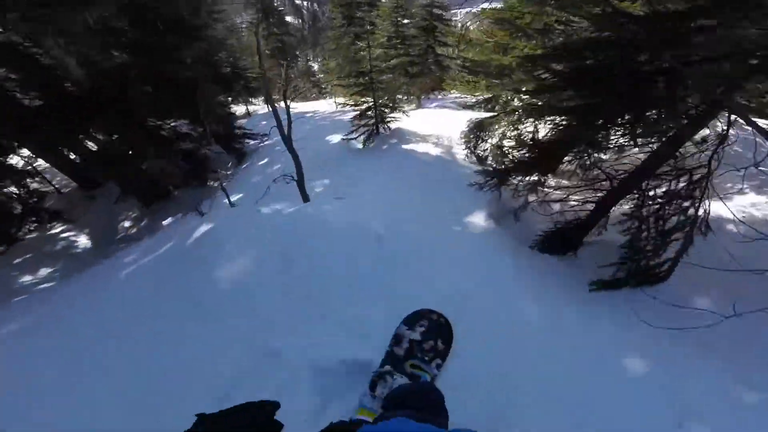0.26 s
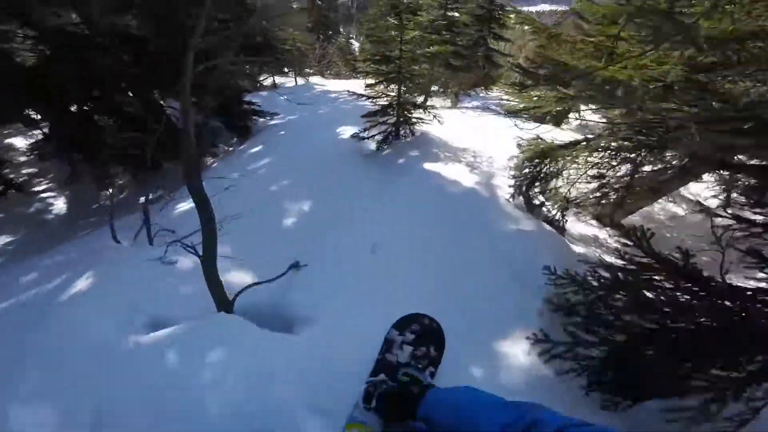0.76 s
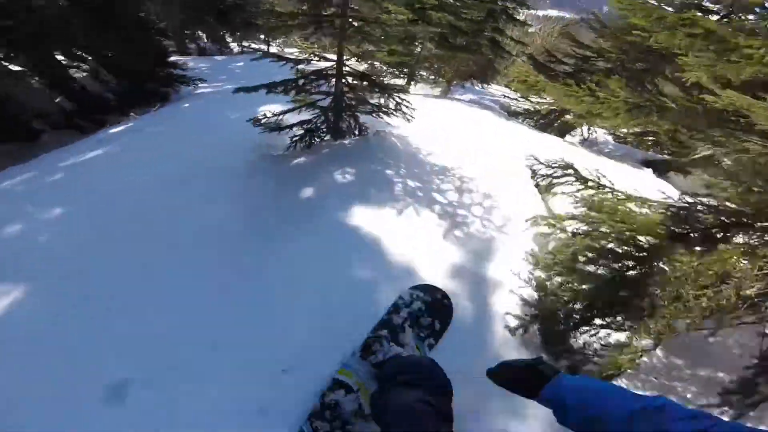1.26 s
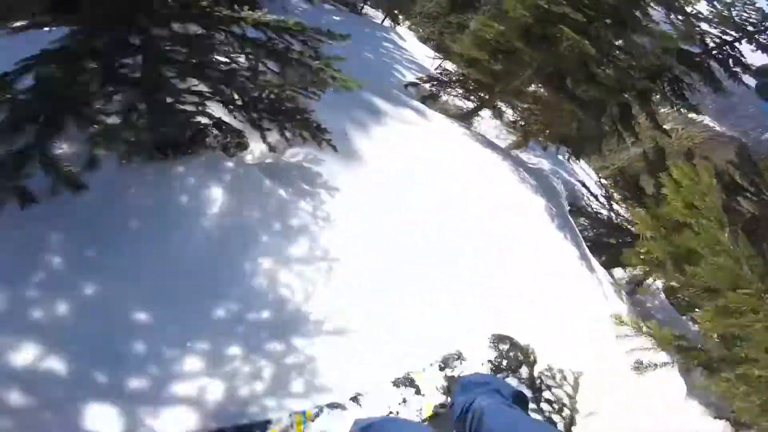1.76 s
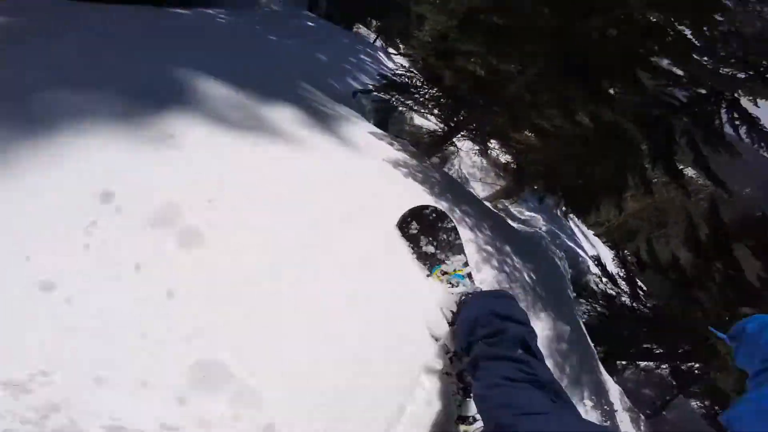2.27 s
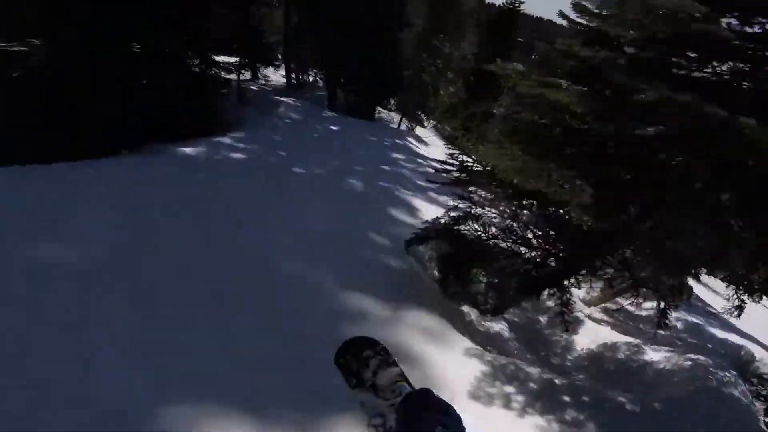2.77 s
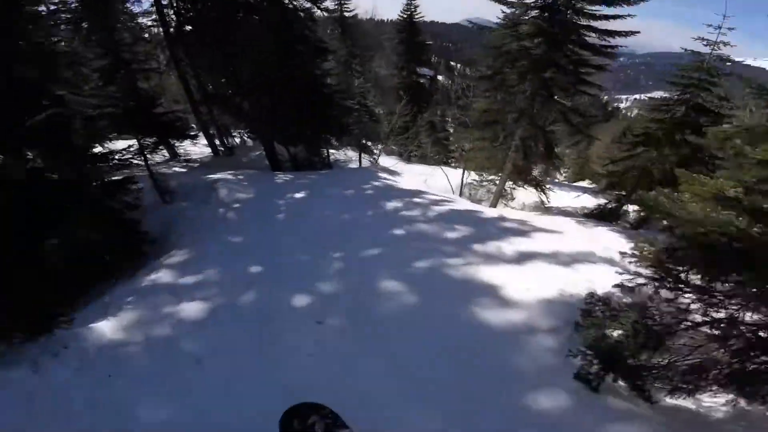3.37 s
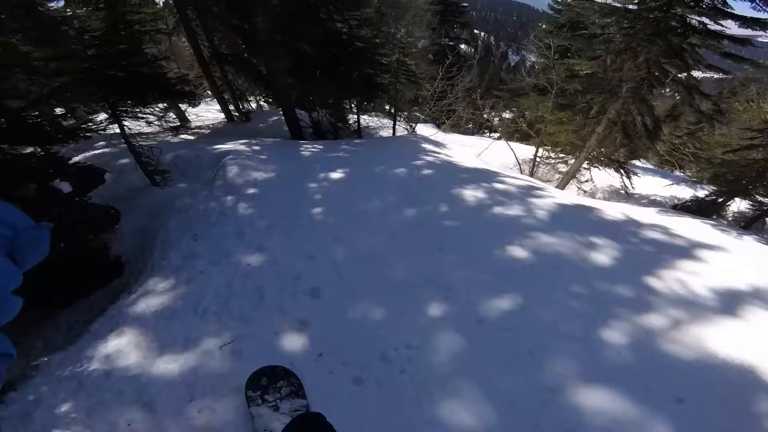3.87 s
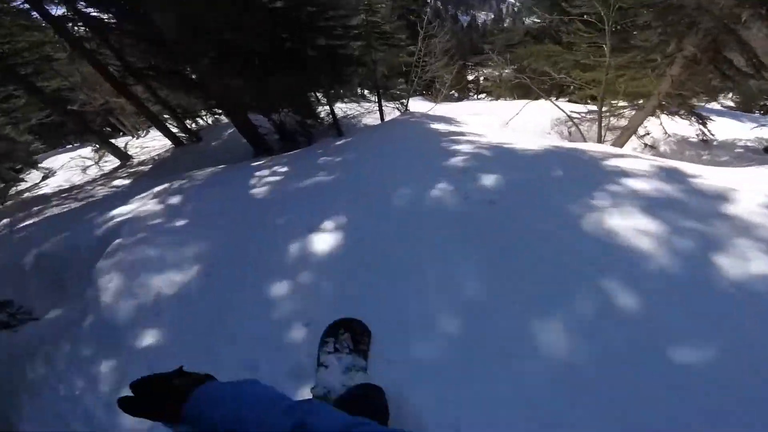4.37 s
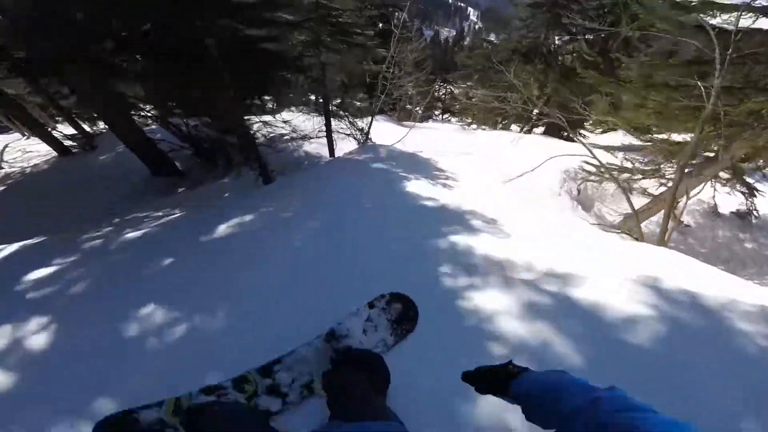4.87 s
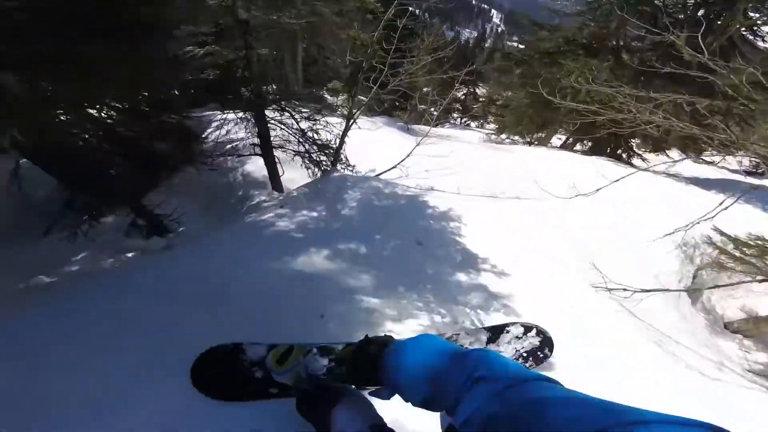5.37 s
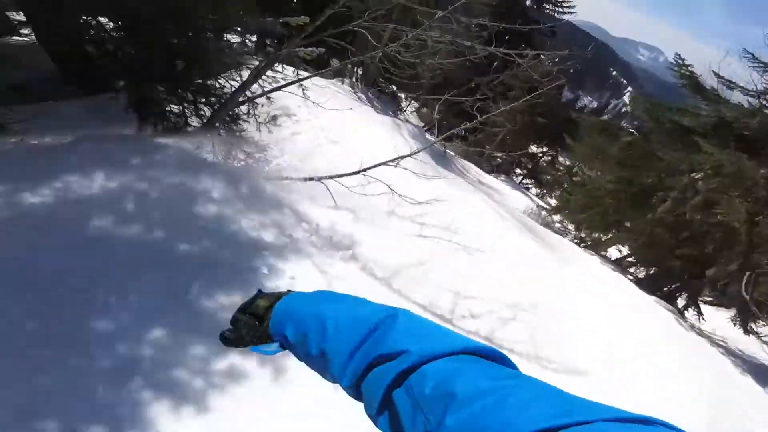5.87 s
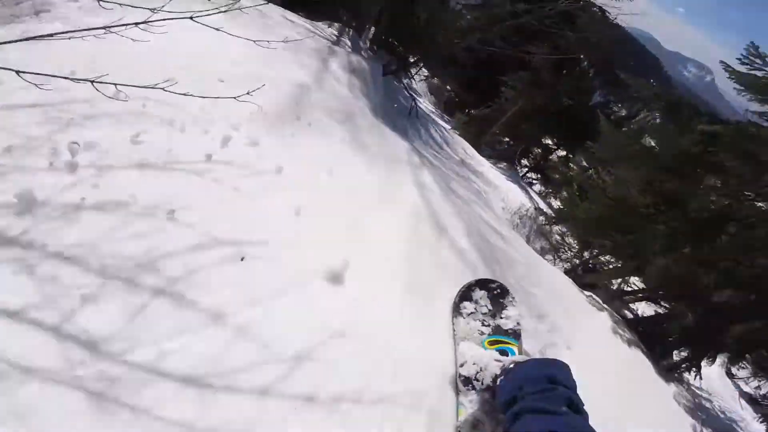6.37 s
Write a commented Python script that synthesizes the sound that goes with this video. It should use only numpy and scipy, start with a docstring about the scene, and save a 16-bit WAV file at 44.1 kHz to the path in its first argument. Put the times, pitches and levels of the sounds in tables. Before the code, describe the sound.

Close mono sound from a helmet camera on a snowboard ride outdoors. The edge is already skidding at the start, hissing and crunching on packed snow under low, heaving wind. Short rubs and light knocks come at 0.1 to 0.9 seconds. From about 0.8 a longer, stronger scrape holds until 1.7, with crust cracking; a tight cluster of dull, heavy thumps follows at 1.74 to 1.78, then a sharp brief scrape at 1.9 with dry ticks. The spray slowly fades. Around 2.8 to 3.8 the ride is calmer, with hollow base rubs and thin wind. At 4.1 to 4.3 a bite, crackles and a strong wind surge arrive. Between 4.7 and 5.5 come the hardest, roaring, bright skids. A last broad scrape swells around 6 and eases away, with low thumps at 6.0 and 6.27 amid gusts.

```python
"""Wind heaves at a helmet camera's microphone while a snowboard edge is already skidding on packed snow.
Filtered noise makes slow swell, buffeting and a low roar, which surge at times; lulls thin the swell and buffeting.
Random clicks make the board: a rumbling base, a crunching edge and hissing spray that rings the camera's case.
Short rubs of the base and dull thumps of the mount join in, then cracking crust and a few dry ticks.
Skid after skid bites, holds and lets go over a steady glide."""
import sys
import numpy as np
from scipy import signal
from scipy.fft import rfft, irfft, next_fast_len
from scipy.io import wavfile
from scipy.ndimage import uniform_filter1d, map_coordinates

SR = 44100
rng = np.random.default_rng(int(sys.argv[2]) if len(sys.argv) > 2 else 0)


def wrap_up_sound(samples):
    """Save the sound to the file named by the first command line argument, as 16-bit audio."""
    columns = np.atleast_2d(samples).T
    # keep every value between -1 and 1, then stretch to whole-number steps
    tamed = np.clip(columns, -1, 1)
    steps = np.round(tamed * 32767).astype(np.int16)
    wavfile.write(sys.argv[1], SR, steps)


N = 292681
T, HZ = np.arange(N) / SR, np.fft.rfftfreq(N, 1 / SR)

# airflow at the microphone, which counts relative to CRUISE_DB: (time [s], strength [dB])
AIRFLOW = [(0.0, -25.5), (0.3, -26.5), (0.75, -28), (1.4, -20), (2.05, -21), (2.65, -28), (2.85, -30.5),
           (3.35, -29.5), (4.25, -19), (5.0, -24), (5.55, -21), (5.75, -24), (6.15, -19.5), (6.64, -28)]
# large vortices that roll off the helmet, before lulls: (time [s], half length [s], swell level [dB])
VORTICES = [(0.014, 0.055, -15.5), (1.286, .04, -19.5), (1.394, 0.021, -15.5), (1.628, 0.063, -38),
            (1.877, 0.13, -23), (2.07, 0.06, -17.5), (2.33, 0.064, -22), (2.612, 0.028, -17),
            (3.108, 0.076, -25), (4.267, 0.087, -18.5), (4.458, 0.047, -19.5), (5.142, 0.023, -16),
            (5.458, 0.082, -22.5), (5.633, 0.03, -24), (5.916, 0.025, -14), (6.17, 0.058, -16),
            (6.438, 0.045, -18)]
# surges of low rumble, before lulls: gusts buffet the microphone, and the board roars low in hard turns:
# (time [s], half length [s], buffeting level [dB], low roar level [dB])
SURGES = [(0.543, 0.034, -32, -45), (0.832, 0.032, -31, -37), (1.002, 0.031, -42, -36),
          (1.12, 0.079, -34.5, -36), (1.443, 0.19, -45, -37), (1.724, 0.067, -25.5, -41),
          (1.932, 0.038, -36, -33), (2.144, 0.13, -39, -49), (2.372, 0.029, -24.5, -40),
          (2.9, 0.13, -38, -55), (3.314, 0.078, -34, -60), (3.735, 0.11, -33.5, -51),
          (3.98, 0.09, -24.5, -38), (4.104, 0.029, -23.5, -39), (4.24, 0.099, -19.5, -35),
          (4.279, 0.025, -17.5, -33), (4.52, 0.092, -25, -39.5), (4.79, 0.14, -29.5, -33.5),
          (5.06, 0.069, -44, -33), (5.2, 0.096, -27, -28.5), (5.353, 0.11, -29.5, -28),
          (5.616, 0.018, -23, -54), (6, 0.14, -29.5, -37.5), (6.226, 0.059, -29.5, -35),
          (6.548, 0.37, -43, -41.5)]
# lulls, where the airflow leaves the microphone; a negative depth is a lift:
# (time [s], half length [s], depth [dB])
LULLS = [(0.426, .07, 6), (0.73, 0.044, 1), (1.002, 0.027, 2), (1.53, 0.027, 4), (2.0, 0.018, 0),
         (2.195, 0.048, -3), (2.446, .04, 10), (2.714, .035, 0), (2.99, 0.033, 6), (3.477, 0.042, -2),
         (4.43, 0.02, 5), (5.82, 0.027, 5), (6.353, 0.027, -4.5)]
# low spectra, only their shape counts: (frequency [Hz], relative level [dB])
SWELL_SPECTRUM = [(4, -12.5), (10, -3.5), (16, 0.5), (23, 4), (30, -8.5), (42, -24), (80, -90), (300, -140)]
BUFFET_SPECTRUM = [(15, 3), (28, -2), (38, 7), (50, 7.5), (70, -9), (100, -23), (160, -30), (800, -140)]
ROAR_SPECTRUM = [(35, -31), (65, 4), (95, 5), (140, -1), (220, -5), (350, -11.5), (600, -21.5), (1500, -65),
                 (8000, -130)]

# skids, where the edge is pressed into the snow, before the layer trims in board():
# (start [s], rise [s], hold [s], release [s], crunch level [dB],
#  spray relative to crunch [dB], rumble relative to crunch [dB])
SKIDS = [(-0.05, 0.045, 0.16, 0.17, -52.5, 11, -1), (0.208, 0.12, 0.2, 0.076, -53, 8.5, 5.5),
         (0.495, 0.15, 0.14, 0.089, -60, 13, -15), (0.736, 0.26, 0.72, 0.23, -45, 10, 1),
         (1.517, 0.036, 0.082, 0.084, -49, 5, -4), (1.737, 0.025, 0.023, .012, -52.5, 15.5, 7),
         (1.81, 0.024, 0.064, .04, -55, 10, 2), (1.881, 0.048, 0.044, 0.03, -42.5, 5.5, 3),
         (1.956, 0.063, 0.18, 0.82, -52, 6, 3.5), (2.61, 0.14, 0.2, 0.17, -53.5, 4.5, 3.5),
         (2.78, 0.32, .11, 0.29, -49, 9.5, 2), (3.364, 0.19, 0.051, 0.042, -61, 7, 14),
         (3.66, 0.017, 0.039, 0.026, -61.5, 12, 13.5), (3.781, 0.006, 0.065, 0.055, -56, 13, 11.5),
         (3.875, 0.073, 0.2, 0.057, -56, -5, 14), (4.035, 0.05, 0.13, 0.36, -49.5, 9.5, 4),
         (4.127, 0.052, 0.017, 0.065, -43.5, 6.5, 4.5), (4.257, 0.17, 0.26, 0.16, -55.5, 8, 6),
         (4.59, 0.25, 0.044, 0.048, -48.5, 9, 0), (4.793, 0.2, 0.022, 0.098, -40, 11, 3.5),
         (5.022, 0.14, 0.077, 0.33, -40, 9, 3), (5.38, 0.06, 0.067, 0.18, -42.5, 5.5, 1),
         (5.565, 0.05, 0.19, 0.3, -55, 13.5, 3), (5.75, 0.018, 0.064, 0.06, -51.5, 6.5, 1),
         (5.795, 0.25, 0.27, 0.55, -46.5, 7.8, 3)]
# snow spectra, only their shape counts: (frequency [Hz], relative level [dB])
BASE_SPECTRUM = [(60, -37), (160, -1), (300, 1.5), (480, 1), (680, 0), (950, -5.5), (1400, -12),
                 (2500, -25.5), (6000, -66), (12000, -110)]
CRUNCH_SPECTRUM = [(300, -22), (800, 3), (1400, 1.5), (2000, 2.5), (3100, 1), (4000, -6), (6000, -11),
                   (9000, -50), (12000, -58), (15000, -70)]
SPRAY_SPECTRUM = [(1500, -36), (3500, -8), (4500, -13), (5200, -0.5), (7200, -1.5), (8500, -6),
                  (10000, -11), (11000, -22.5), (12500, -33.5), (14000, -38)]
# air resonances of the camera's case: (centre [Hz], width [Hz], lift of each alone [dB])
CASE_RESONANCES = [(4870, 1400, 5), (5600, 540, 5), (6490, 490, 9.5)]

# the base rubs over a bump or a firm patch: (time [s], level [dB], length [s], centre [Hz], width [Hz])
RUBS = [(0.114, -41, 0.0067, 744, 350), (0.311, -50, 0.079, 1540, 180), (0.88, -61, .04, 2500, 2000),
        (0.94, -43, 0.058, 900, 600), (1.091, -40, 0.042, 470, 300), (2.316, -46, .06, 600, 450),
        (2.78, -43, 0.12, 554, 444), (2.784, -53, 0.021, 1540, 160), (2.87, -41, 0.02, 670, 547),
        (2.917, -36, 0.019, 545, 300), (2.968, -39.5, 0.03, 630, 380), (3.16, -46, 0.1, 680, 300),
        (3.327, -44, 0.06, 644, 280), (3.42, -55.5, 0.1, 1300, 700), (3.553, -46, .05, 450, 350),
        (3.673, -41, .008, 740, 402), (3.976, -53, 0.07, 1300, 700), (3.831, -34, 0.022, 424, 320),
        (4.102, -41, 0.077, 390, 280), (4.204, -37.5, 0.014, 1140, 700), (5.008, -44, 0.21, 3000, 600),
        (5.09, -39, 0.07, 676, 600), (5.226, -38, .07, 600, 550), (5.256, -45, 0.027, 1490, 700),
        (5.343, -44, 0.17, 2900, 1300), (5.507, -47, .06, 1700, 900), (5.305, -44, 0.027, 800, 700),
        (5.476, -36, 0.016, 464, 250), (5.573, -40, 0.026, 890, 350), (6.14, -44, .07, 720, 450)]
# jolts of the mount: (time [s], peak [dB], blow's standard deviation [s], mount resonance [Hz], damping [ratio])
THUMPS = [(0.1146, -24.5, 0.00087, 176, 0.38), (0.494, -28, 0.00044, 230, 1.3),
          (0.618, -39, 0.00074, 180, 1.1), (0.638, -41, 0.0006, 200, 1), (0.8243, -27, 0.0014, 114, 0.9),
          (1.7366, -27, 0.0009, 150, 1.1), (1.743, -18.5, 0.00073, 160, 1.1),
          (1.7526, -21, 0.00057, 220, 1), (1.754, -18, 0.0007, 135, 0.95), (1.7637, -12.5, 0.0018, 80, 1.3),
          (1.7668, -15.5, 0.00047, 99, 0.73), (1.7754, -10, 0.00065, 149, 1.4),
          (4.0636, -24, 0.00036, 260, 0.89), (5.9874, -14, 0.00085, 85, 1.16),
          (6.2685, -12.5, 0.0004, 75, 0.47), (6.2717, -21, 0.00046, 230, 1.1),
          (6.2818, -11, 0.00042, 74, 1.3)]
# bits of crust that crack under the board, before the trims in cracks():
# (time [s], level [dB], decay time [s], spray relative to that level [dB])
CRACKS = [(0.556, -48, .003, 4), (0.57, -46, .003, 3), (0.585, -48, .003, 8), (1.066, -37.5, 0.013, 4),
          (1.25, -47, .008, 11), (1.573, -35.5, 0.023, -2), (1.645, -46, .012, 4), (1.697, -36, .014, -6),
          (1.975, -36, 0.0039, 3), (2.199, -41, 0.01, 0), (3.207, -49, 0.016, 15), (3.665, -46, 0.0025, 8),
          (3.706, -49.5, 0.0042, 9), (3.785, -46, 0.0053, 4), (3.8, -48, .0015, 0),
          (3.838, -47, 0.0029, -11), (4.061, -43, 0.0067, -1), (4.095, -43, 0.0042, 7),
          (4.208, -34, 0.0046, 0), (4.266, -36, 0.0057, 2), (5.137, -41.5, 0.0071, 8)]
# dry ticks close to the microphone: (time [s], step height before softening [dB])
TICKS = [(1.7876, -14), (1.978, -19.5), (2.012, -23.5), (3.835, -29)]

CRUISE_DB = -22.5  # airflow at an ordinary riding speed
# level at that speed before surges and lulls [dB], and its growth [dB per dB of airflow]
SWELL_DB, SWELL_GROWTH = -24, 0.93
BUFFET_DB, BUFFET_GROWTH = -44, 0.26
ROAR_DB, ROAR_GROWTH = -43.5, 1
LULL_SHARE = 0.3  # part of a lull's depth that the buffeting shares
# the board running flat, before the layer trims in board() [dB]
GLIDE_BASE_DB, GLIDE_CRUNCH_DB, GLIDE_SPRAY_DB = -53, -57.5, -52.5
EDGE_HZ = 14500  # start of the camera's stop band


def amp(db):
    """Turns decibels into gain."""
    return 10 ** (np.asarray(db) / 20)


def unit(x):
    """Scales a sound to rms 1."""
    return x / np.sqrt(np.mean(x ** 2) + 1e-20)


def level(table, axis):
    """Draws one dB column of a table as a curve over time."""
    rows = np.array(table)
    return np.interp(T, rows[:, 0], rows[:, axis])


def shape(points):
    """Draws a spectrum in dB on every frequency bin, straight between points on a log axis."""
    hz, db = np.transpose(points)
    return np.interp(np.log(HZ + 1), np.log(hz), db)


def colour(x, db):
    """Filters a sound by a dB spectrum."""
    size = next_fast_len(N + 4096)
    gain = amp(np.interp(np.fft.rfftfreq(size, 1 / SR), HZ, db))
    return irfft(rfft(x, size) * gain, size)[:N]


def flutter(rate_hz):
    """Wanders smoothly at random with rms 1, changing up to about the given rate."""
    knots = rng.standard_normal(4096)
    return unit(map_coordinates(knots, [2 * rate_hz * T], order=2, mode="wrap"))


def steadied(x, span):
    """Evens out the power of a sound over a span of seconds."""
    power = signal.oaconvolve(x ** 2, np.hanning(int(span * SR) + 3), "same")
    return unit(x / np.sqrt(abs(power) + 1e-9))


def grains(per_s, spread_db):
    """Scatters random clicks, most of them small and a few large."""
    size = amp(spread_db * np.minimum(rng.exponential(1, N), 4))
    sign = rng.choice([-1., 1.], N)
    struck = rng.random(N) < per_s / SR
    return unit(size * sign * struck)


def mottled(x, depth_db, span_s=0.067, span_hz=260):
    """Lets the colour of a sound drift in random patches of time and frequency."""
    window, hop = 1024, 256
    z = signal.stft(x, SR, nperseg=window, noverlap=window - hop)[2]
    patches = rng.standard_normal(z.shape[::-1]).T
    patches = uniform_filter1d(patches, max(1, round(span_hz * window / SR)), axis=0)
    patches = uniform_filter1d(patches, max(1, round(span_s * SR / hop)), axis=1)
    drifting = z * amp(depth_db * unit(patches))
    return unit(signal.istft(drifting, SR, nperseg=window, noverlap=window - hop)[1][:N])


def low_gains():
    """Gains of swell, buffeting and roar: all grow with airflow, vortices and surges add power, lulls cut."""
    air_db = level(AIRFLOW, axis=1) - CRUISE_DB
    swell = amp(SWELL_DB + SWELL_GROWTH * air_db) ** 2
    buffet = amp(BUFFET_DB + BUFFET_GROWTH * air_db) ** 2
    roar = amp(ROAR_DB + ROAR_GROWTH * air_db) ** 2
    for s, half_length, db in VORTICES:
        swell = swell + np.exp(-((T - s) / half_length) ** 2) * amp(db) ** 2
    for s, half_length, buffet_db, roar_db in SURGES:
        bell = np.exp(-((T - s) / half_length) ** 2)
        buffet = buffet + bell * amp(buffet_db) ** 2
        roar = roar + bell * amp(roar_db) ** 2
    lull_db = np.zeros(N)
    for s, half_length, depth_db in LULLS:
        lull_db -= depth_db * np.exp(-((T - s) / half_length) ** 2)
    lull = amp(lull_db)
    # the low roar carries on through the lulls
    return lull * np.sqrt(swell), lull ** LULL_SHARE * np.sqrt(buffet), np.sqrt(roar)


def wind_and_roar(flicker_db=1.0):
    """Large vortices heave the diaphragm, smaller ones buffet it, and a quickly flickering low roar joins them."""
    swell = steadied(colour(rng.standard_normal(N), shape(SWELL_SPECTRUM)), span=0.079)
    buffet = steadied(colour(rng.standard_normal(N), shape(BUFFET_SPECTRUM)), span=0.34)
    roar = colour(rng.standard_normal(N), shape(ROAR_SPECTRUM))
    roar = steadied(roar * amp(flicker_db * flutter(rate_hz=35)), span=0.27)
    swell_gain, buffet_gain, roar_gain = low_gains()
    return swell_gain * swell + buffet_gain * buffet + roar_gain * roar


def edging():
    """Gains of rumble, crunch and spray: each skid bites, holds and lets go on top of the steady glide."""
    power = amp([[GLIDE_BASE_DB], [GLIDE_CRUNCH_DB], [GLIDE_SPRAY_DB]]) ** 2
    for start, rise, hold, release, db, spray_db, rumble_db in SKIDS:
        letting_go = np.clip((T - start - rise - hold) / release, 0, 10)
        pressure = np.clip((T - start) / rise, 0, 1) * np.exp(-2 * letting_go ** 2)
        power = power + (pressure * amp([[db + rumble_db], [db], [db + spray_db]])) ** 2
    return np.sqrt(power)


def case_db():
    """Lift in dB that the resonant cavities of the camera's case give to the treble."""
    power = 1
    for hz, width, db in CASE_RESONANCES:
        power = power + (amp(db) ** 2 - 1) / (1 + (2 * (HZ - hz) / width) ** 2) ** 2
    return 10 * np.log10(power)


def board(base_db=0.66, crunch_db=1, spray_db=0,  # layer trims
          base_chatter_db=1.23, crunch_chatter_db=0.12, spray_chatter_db=0.5,  # rms of the shaking
          base_bumps_db=1, crunch_bumps_db=.5, spray_bumps_db=.5):
    """Snow collapses in grains; bumps and the edge's chatter shake rumble, crunch and spray together."""
    chatter, bumps = flutter(rate_hz=55), flutter(rate_hz=13)
    base = colour(grains(per_s=1900, spread_db=1.5), shape(BASE_SPECTRUM))
    base = steadied(mottled(base, depth_db=2.0), span=0.56)
    crunch = colour(grains(per_s=7000, spread_db=1.0), shape(CRUNCH_SPECTRUM) + case_db())
    crunch = mottled(crunch, depth_db=1.47)
    spray = colour(grains(per_s=16000, spread_db=2.0), shape(SPRAY_SPECTRUM) + case_db())
    spray = mottled(spray, depth_db=1.5)
    base_gain, crunch_gain, spray_gain = edging()
    base_gain = base_gain * amp(base_db + base_chatter_db * chatter + base_bumps_db * bumps)
    crunch_gain = crunch_gain * amp(crunch_db + crunch_chatter_db * chatter + crunch_bumps_db * bumps)
    spray_gain = spray_gain * amp(spray_db + spray_chatter_db * chatter + spray_bumps_db * bumps)
    return base * base_gain + crunch * crunch_gain + spray * spray_gain


def rubs():
    """A run of tiny slips briefly drives one broad resonance of the board."""
    out, slips = np.zeros(N), grains(per_s=900, spread_db=2.5)
    for s, db, length, centre_hz, width_hz in RUBS:
        near = abs(T - s) < 2 * length + .1
        hz = np.fft.rfftfreq(near.sum(), 1 / SR)
        resonance = 1 / (1 + 2 * ((hz - centre_hz) / width_hz) ** 2)
        ring = irfft(rfft(slips[near]) * resonance, near.sum())
        bell = np.exp(-2 * ((T[near] - s) / length) ** 2)
        out[near] += amp(db) * steadied(ring, span=0.049) * bell
    return out


def thumps(leak_hz=35):
    """A rounded blow swings the mount until it settles; the shorter the contact, the crisper the knock."""
    out, t = np.zeros(N), np.arange(-4096, 4096) / SR
    hz = np.fft.rfftfreq(len(t), 1 / SR)
    leak = 1j * hz / (leak_hz + 1j * hz)  # first-order low cut
    for s, db, contact_s, pitch_hz, damping in THUMPS:
        blow = np.exp(-.5 * (2 * np.pi * hz * contact_s) ** 2)
        ratio = 1j * hz / pitch_hz
        mount = ratio / (1 + damping * ratio + ratio ** 2)
        thud = np.fft.fftshift(irfft(blow * mount * leak))
        out += np.interp(T - s, t, amp(db) * thud / abs(thud).max(), 0, 0)
    return out


def cracks(body_db=-3, snap_db=-3, rise_s=0.00091):
    """Each crack is a sharp burst that dies away: a knock in the base, a snap, and a puff of spray."""
    dull, bright = np.zeros((2, N))
    for s, db, decay, bright_db in CRACKS:
        rise = np.clip(1 + (T - s) / rise_s, 0, 1)
        burst = amp(db) * rise * np.exp(-np.minimum(abs(T - s) / decay, 20))
        dull += burst
        bright += burst * amp(bright_db)
    body = unit(colour(rng.standard_normal(N), shape(BASE_SPECTRUM)))
    snap = unit(colour(rng.standard_normal(N), shape(CRUNCH_SPECTRUM)))
    puff = unit(colour(rng.standard_normal(N), shape(SPRAY_SPECTRUM) + case_db()))
    return dull * (amp(body_db) * body + amp(snap_db) * snap) + bright * puff


def ticks(leak_s=0.0041, soften_hz=7500):
    """Each tick is a sudden step of pressure that leaks away, softened in the high treble."""
    steps = np.zeros(N)
    for s, db in TICKS:
        steps += amp(db) * (T >= s) * np.exp(-np.minimum(abs(T - s) / leak_s, 20))
    return colour(steps, -20 * np.log10(1 + (HZ / soften_hz) ** 6))


def scene():
    """Sums every layer at the one microphone."""
    return (wind_and_roar() + board() + rubs() + thumps() + cracks() + ticks())[None]


def record(dry):
    """Applies the camera's band limit, a steep low-pass at least 70 dB down from EDGE_HZ upward."""
    return signal.sosfilt(signal.cheby2(12, 70, EDGE_HZ, fs=SR, output="sos"), dry)


dry = scene()
out = record(dry)
wrap_up_sound(out)
```